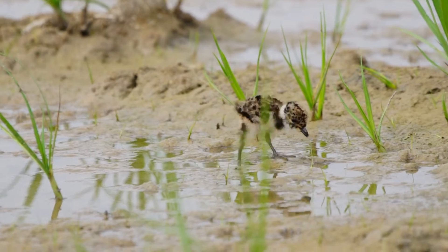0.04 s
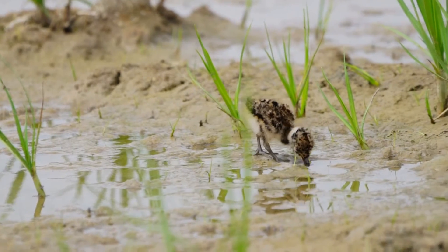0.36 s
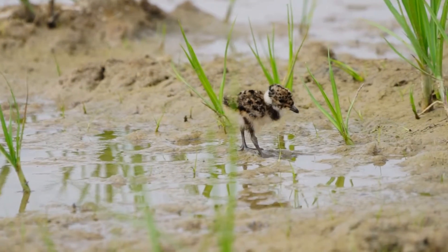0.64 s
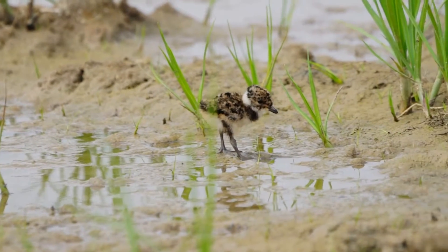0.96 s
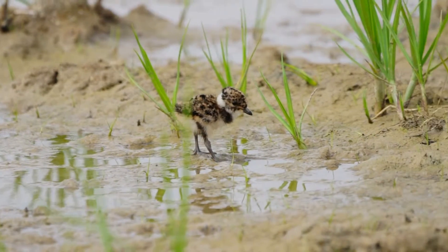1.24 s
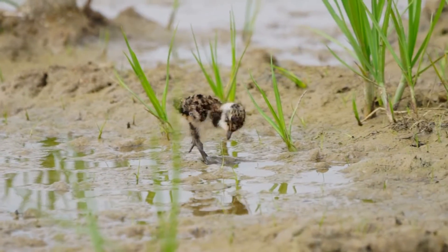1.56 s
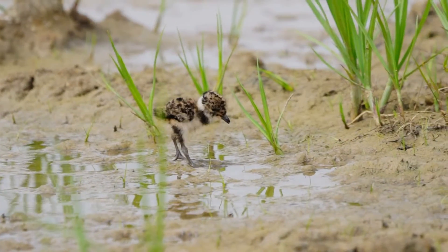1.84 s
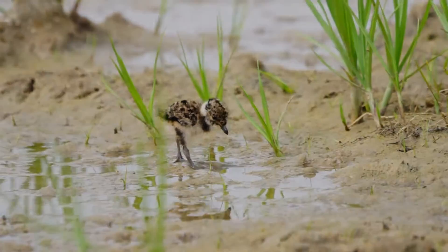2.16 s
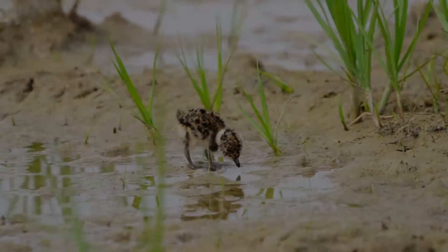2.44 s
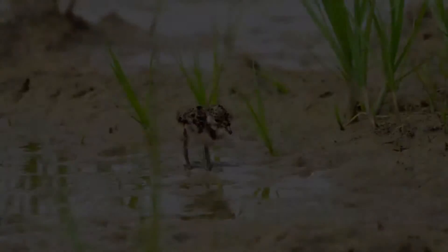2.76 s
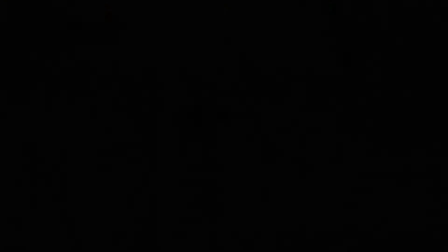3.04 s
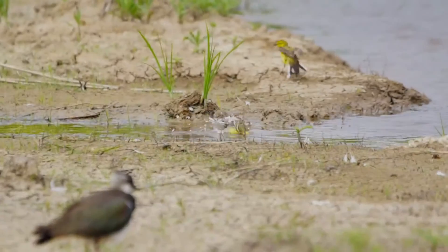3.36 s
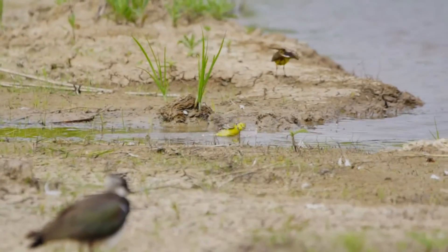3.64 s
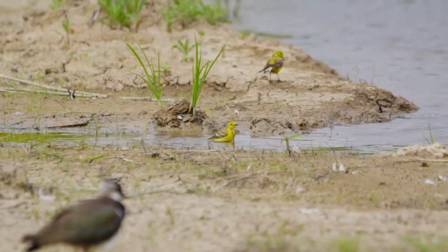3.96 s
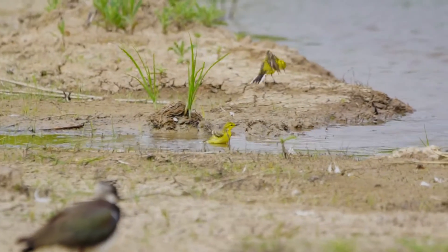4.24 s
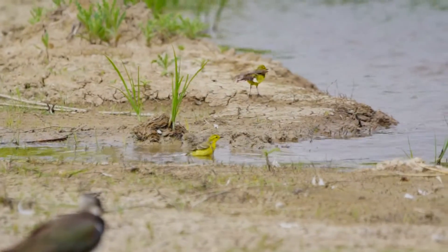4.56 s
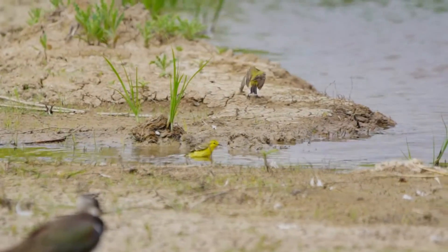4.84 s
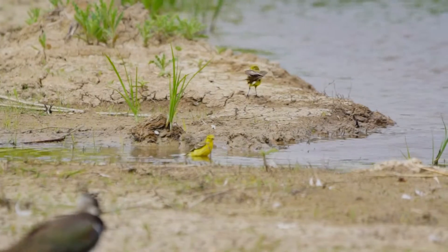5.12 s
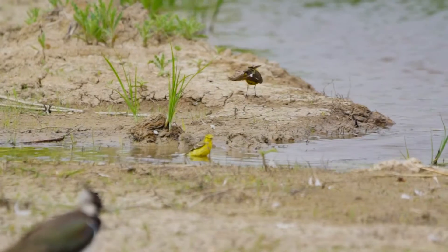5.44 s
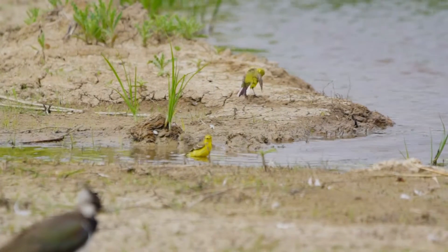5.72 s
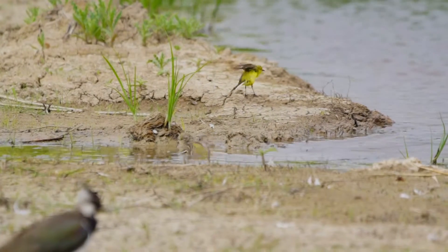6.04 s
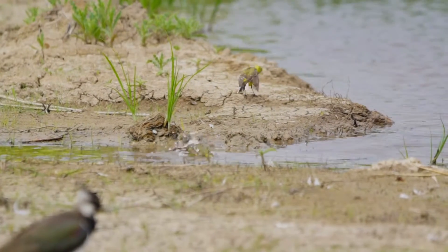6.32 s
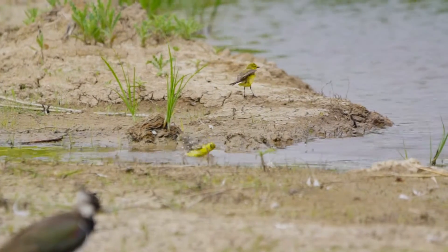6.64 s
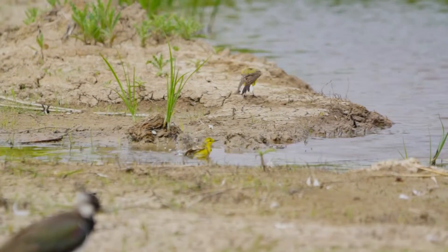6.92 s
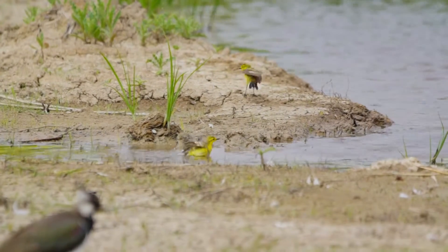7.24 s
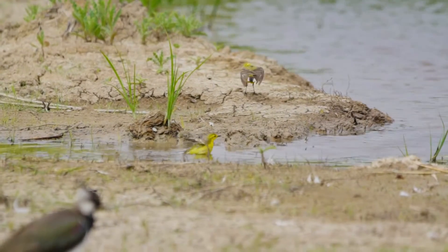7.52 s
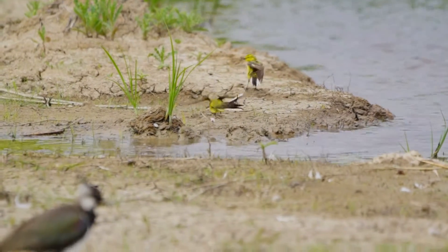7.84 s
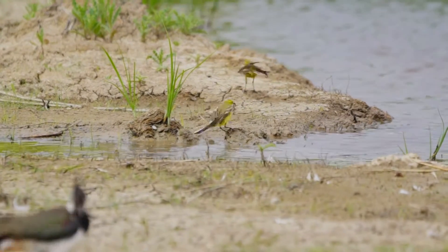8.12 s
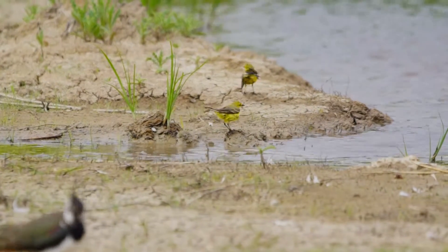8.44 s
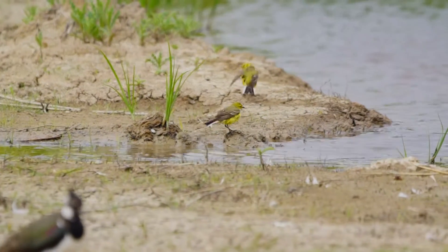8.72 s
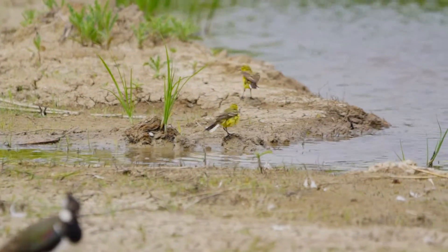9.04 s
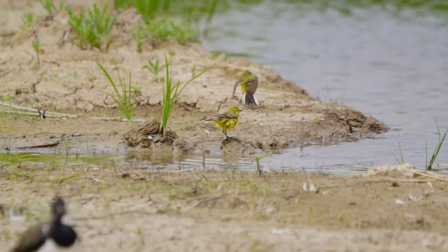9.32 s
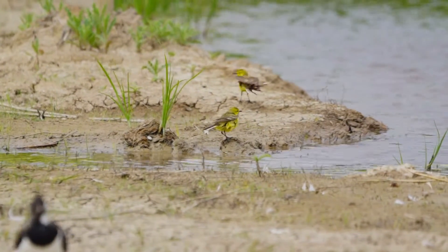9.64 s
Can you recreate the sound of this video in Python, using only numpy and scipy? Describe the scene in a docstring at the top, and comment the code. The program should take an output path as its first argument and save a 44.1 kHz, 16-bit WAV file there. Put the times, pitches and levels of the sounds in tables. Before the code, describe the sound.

On an open wetland shore, small birds chirp, whistle and trill in the distance over a soft hiss and a very light breeze. At about 2.2 seconds a lapwing, close and slightly to the right, gives one loud, harsh, wheezy cry in two parts, ending near 2.8 seconds. Wind rises straight afterwards and buffets the microphone with a low, lumpy rumble, broken by brief lulls. The gusts are strongest from about 5 to 8 seconds, when a thin crackle joins them. The small birds continue faintly underneath, mostly to the left, with short high chips and trills that stand out most around 3 to 6 seconds. A few tiny dry ticks are scattered between 2 and 7 seconds. From about 8.3 seconds the wind eases somewhat, and soft twittering, slurred whistles and a short scratchy bird rattle carry on until the end, just before 10 seconds.

```python
"""A lapwing gives one harsh, wheezy two-part cry on a muddy wetland shore.
One side of its syrinx sings a harmonic stack; the other slaps, chopping the tone and ringing the throat.
Wind rises after the cry and buffets the microphone in lumpy gusts, with brief lulls and a thin crackle.
Far off, small birds chirp, trill and rattle in near-sine glides, over faint ticks and a soft hiss."""
import sys
import numpy as np
from scipy import signal
from scipy.fft import rfft, irfft, next_fast_len
from scipy.io import wavfile
from scipy.ndimage import uniform_filter1d

SR = 44100
rng = np.random.default_rng(int(sys.argv[2]) if len(sys.argv) > 2 else 0)


def generate_wav(signal):
    """Clip the signal to [-1, 1] and save it as 16-bit WAV at the path in sys.argv[1]."""
    frames = np.transpose(np.atleast_2d(signal))
    scaled = np.clip(frames, -1, 1) * 32767
    pcm = np.round(scaled).astype(np.int16)
    wavfile.write(sys.argv[1], SR, pcm)


N = 431298
T = np.arange(N) / SR
SIZE = next_fast_len(N + SR, real=True)
HZ = np.fft.rfftfreq(SIZE, 1 / SR)

# The lapwing's cry. Each row: time in seconds, pitch in Hz, effort in dB, roughness (0 clear, 1 all rasp).
CRY = [(2.204, 1014, -60, 1.1), (2.233, 1051, -43, 0.97), (2.243, 1052, -40, 0.92),
       (2.281, 1073, -36, 0.76), (2.293, 1104, -35.5, 0.34), (2.325, 1160, -33, 0),
       (2.355, 1184, -30.5, 0.18), (2.401, 1223, -35, 0.3), (2.413, 1250, -36, 0.64),
       (2.47, 1292, -40.5, 1.1), (2.52, 1270, -41.5, .98), (2.56, 1237, -60, 1), (2.6, 1196, -43, 0.98),
       (2.64, 1192, -39, 1.02), (2.66, 1160, -32, 0.62), (2.69, 1233, -32, .48), (2.716, 1169, -29, .22),
       (2.733, 1223, -30, 0.23), (2.749, 1144, -37, 0.3), (2.762, 1085, -54, 0.45), (2.776, 1076, -67, .66)]
FULL_EFFORT_DB, BREAK_S = -28, 2.56
# The voice before and after the break. Each row: fundamental in dB, half-pitch lines in dB,
# jitter as a share of the pitch, brightness in dB per octave.
SYLLABLES = [(-9.5, -13.5, .004, 3), (-15.5, -20, 0.0077, -4.5)]
# The sung stack. Each row: harmonic number, relative level in dB.
OVERTONES = [(2, -8), (3, 6.5), (4, -11), (5, -4.5), (6, -4), (7, -14), (8, -9), (9, -12.5), (10, -26),
             (11, -30), (12, -38)]
# The colour of throat and bill. Each row: frequency in Hz, gain in dB.
THROAT_EQ = [(500, -20), (1200, -10), (1800, -25), (2600, -16), (3120, -5), (3600, -7), (4050, -12),
             (4700, -9), (5600, -15), (7100, -11), (8800, -18), (9900, -13), (12500, -27), (15000, -52)]
# The pace of the rough side of the syrinx. Each row: time in seconds, slaps per second.
SLAP_RATE = [(2.24, 195), (2.285, 335), (2.41, 259.5), (2.47, 165), (2.6, 129), (2.65, 190), (2.67, 270),
             (2.74, 290)]
# Lone hard slaps at the onset and around the break. Each row: start in seconds, level in dB.
LONE_SLAPS = [(2.215, -44), (2.228, -44), (2.506, -39), (2.546, -37), (2.568, -35), (2.589, -35.5),
              (2.635, -39)]
# What a slap rings. Each row: frequency in Hz, level in dB with the bill half shut, level in dB with it open.
THROAT_RINGS = [(3150, -8, -11), (3520, 0, -0.5), (3900, -4, -4), (5940, -4, -7.5), (6950, -13, -7.5),
                (9900, -25, -18), (12600, -36, -26)]
# The bill opens: start and end in seconds.
BILL_OPENS_S = (2.31, 2.35)

# The wind's fader ride. Each row: time in seconds, relative level in dB.
WIND_LEVEL = [(0.0, -64), (0.31, -47), (0.94, -62), (0.99, -44), (1.05, -75), (1.52, -74), (1.6, -56),
              (1.82, -48), (2.0, -88), (2.05, -50.5), (2.18, -39), (2.26, -43.5), (2.4, -32.5), (2.44, -38),
              (2.61, -34.5), (2.76, -44.5), (2.8, -27.5), (2.95, -29), (3.15, -40), (3.64, -23),
              (3.69, -27), (4.5, -29), (4.55, -37), (4.57, -24), (4.92, -24), (5.0, -20), (5.19, -22.5),
              (5.39, -29), (5.41, -20.5), (5.62, -20.5), (6.16, -25.5), (6.33, -20), (8.1, -21),
              (8.36, -31.5), (8.53, -27), (8.615, -24.5), (8.66, -26), (9.0, -36.5), (9.35, -26.5),
              (9.78, -30)]
# Wind speed. Each row: time in seconds, factor on the frequencies of the eddies.
WIND_SPEED = [(0, 0.31), (2, 0.5), (2.6, 0.5), (2.9, 0.7), (3.3, 0.81), (3.7, 0.94), (4.4, 0.88),
              (4.9, .92), (5.01, 1.1), (5.33, .86), (5.62, 1.04), (5.75, .88), (6.15, 0.86), (6.35, 1.08),
              (6.6, 1.28), (7.15, 1.08), (7.35, 1.36), (7.72, 1.393), (8.1, 1.14), (8.35, 0.85), (8.53, .9),
              (8.61, 1.2), (8.68, .95), (9, 0.72), (9.4, 0.93), (9.78, 0.89)]
# The rumble of the eddies at speed 1. Each row: frequency in Hz, gain in dB.
EDDY_EQ = [(20, -39), (60, -12), (130, -1), (230, 5.5), (400, 4), (600, -6), (900, -19), (1400, -31),
           (2300, -45), (4000, -65.5), (8000, -71.5), (16000, -77.5)]
# The hardest pushes of air. Each row: time in seconds, relative peak in dB.
BUFFETS = [(0.266, -36), (0.433, -37), (0.698, -38.5), (0.98, -30.5), (2.158, -22.5), (2.19, -21),
           (2.811, -16), (2.925, -15.5), (2.961, -17), (3.048, -22), (3.578, -15), (3.642, -17),
           (3.759, -21), (3.84, -18), (4.145, -19), (4.194, -15), (4.238, -20.5), (4.255, -20),
           (4.573, -15), (4.6, -13.5), (4.648, -16.5), (4.856, -14.5), (4.963, -16.5), (5.003, -13.5),
           (5.09, -23.5), (5.129, -18), (5.219, -16.5), (5.41, -11.5), (5.571, -15.5), (5.757, -17),
           (5.805, -13.5), (5.86, -16), (5.902, -13.5), (5.993, -21), (6.08, -14), (6.235, -17),
           (6.449, -15), (6.514, -13.5), (6.548, -13), (6.99, -14), (7.035, -15.5), (7.122, -19.5),
           (7.155, -17), (7.289, -11.5), (7.479, -16), (7.631, -16), (7.88, -15), (7.987, -20),
           (8.107, -14), (8.41, -23.5), (8.556, -27), (8.62, -17), (8.712, -22.5), (9.317, -17.5),
           (9.397, -18), (9.55, -20)]
# Gaps between gusts. Each row: centre in seconds, half-length in seconds, dip in dB (negative lifts).
LULLS = [(2.1, .03, -4), (3.356, 0.044, 8.5), (3.724, 0.02, 2.5), (4.498, 0.034, 2), (5.328, 0.024, 4.5),
         (5.716, 0.023, 6.5), (5.96, 0.021, 10), (7.087, 0.026, 9), (7.19, 0.025, 7.5), (7.982, .035, 5.5),
         (8.383, 0.021, 12), (8.879, 0.022, 8.5), (9.22, 0.074, 3.5)]
# The wind's stereo image. Each row: frequency in Hz, left-right likeness 0-1, left's lead in radians.
WIND_STEREO = [(30, 0.75, 0.94), (58.7, 0.92, 1.3), (135, 0.73, 0.41), (340, 0.54, 1.83), (734, 0.64, 2.52),
               (1350, 0.85, 3.4), (2970, 0.36, 2.9), (8000, .2, 2)]
# Eddies tearing at a microphone port. Each row: start in seconds, relative peak in dB, decay in seconds.
SPITS = [(4.6107, -30.5, 0.00072), (5.009, -39, 0.0018), (5.222, -36, .0008), (5.418, -33.5, 0.0069),
         (5.5782, -32, .001), (5.635, -37, 0.00079), (5.8081, -26, 0.0011), (6.4427, -27, 0.0017),
         (6.529, -35, 0.0041), (6.608, -26, 0.0012), (6.635, -33.5, 0.0034), (6.7126, -22.5, 0.0013),
         (6.786, -30, 0.0045), (6.926, -31.5, 0.003), (6.988, -27.5, 0.0043), (7.042, -38, 0.0018),
         (7.2905, -19, 0.0014), (7.343, -24.5, 0.0022), (7.386, -29.5, .004), (7.755, -26.5, 0.00064),
         (7.881, -29, 0.00074), (8.1487, -28, 0.00062), (8.2104, -32.5, 0.00099), (8.598, -43, 0.0048),
         (8.6265, -28.5, 0.0012)]

# Six kinds of short bird note: falling, rising, gently rising, arched, drooping and flat.
# Each row: start in seconds, length in seconds, middle pitch in Hz, relative level in dB.
FALLING_CHIPS = [(.562, 0.067, 5050, -58.5), (.755, .022, 4400, -66), (.955, .02, 4250, -71),
                 (1.025, 0.023, 4850, -57), (1.093, 0.02, 4800, -52), (1.163, 0.023, 4700, -52.5),
                 (1.238, 0.02, 4640, -55), (1.35, .025, 4350, -68), (1.56, .029, 4480, -62.5),
                 (1.735, .028, 4380, -65), (2.893, 0.014, 5200, -63), (3.063, .016, 5050, -62),
                 (3.15, 0.023, 3050, -74), (3.266, .02, 4750, -78), (3.345, .019, 3150, -72),
                 (4.146, 0.021, 3050, -68), (4.255, 0.024, 4850, -70), (4.34, .014, 3250, -65),
                 (5.329, 0.0081, 3720, -57), (6, .019, 4650, -69), (8.33, .012, 5300, -77),
                 (8.353, .014, 4700, -78), (8.417, .014, 5200, -75), (8.52, .014, 4700, -77),
                 (8.818, 0.02, 4150, -71), (9.008, 0.026, 4500, -66.5), (9.186, .025, 4450, -73),
                 (9.543, 0.022, 3705, -70)]
RISING_CHIPS = [(.46, 0.037, 5170, -58.5), (1.784, 0.047, 6150, -64), (2.842, 0.05, 4230, -61),
                (2.963, .014, 4370, -60), (3.008, 0.053, 4150, -57.5), (3.215, 0.031, 3400, -74),
                (3.62, .03, 4000, -75), (4.205, 0.041, 3150, -68), (4.635, .035, 4050, -68),
                (5.268, .018, 4650, -70), (5.377, .009, 3340, -57), (5.392, 0.0082, 3020, -64),
                (6.478, .032, 4070, -73)]
LIFTED_CHIPS = [(1.08, .02, 4140, -58), (1.132, .016, 5100, -64), (1.149, .022, 4100, -54.5),
                (1.222, .02, 4120, -55.5), (2.82, .022, 3780, -65), (2.985, .017, 3800, -59),
                (5.199, 0.016, 3680, -64.5)]
ARCHED_CHIPS = [(3.598, .02, 3600, -73), (4.304, .038, 4590, -65), (5.342, 0.0206, 4100, -57.5)]
DROOPING_CHIPS = [(1.143, 0.02, 4420, -60), (3.11, 0.032, 4350, -66), (3.31, .032, 4300, -74),
                  (4.277, .02, 4050, -71), (5.305, .014, 4950, -67), (5.364, 0.009, 3944, -59),
                  (5.688, 0.062, 4060, -65), (6.05, .03, 4280, -71), (7.07, 0.051, 4040, -78),
                  (9.258, 0.028, 2920, -75)]
FLAT_PIPS = [(.428, 0.1, 3360, -71), (.44, 0.03, 4720, -67), (.603, 0.063, 4750, -64),
             (1.109, .05, 3000, -64), (1.183, .03, 3000, -62), (1.246, 0.042, 3000, -63),
             (1.375, 0.022, 3760, -66), (7.53, .1, 4030, -77), (8.685, .04, 5300, -81),
             (8.81, 0.0447, 5350, -77), (8.94, .07, 5210, -77), (9.183, 0.035, 5100, -66),
             (9.49, .017, 4070, -66), (9.766, .03, 3550, -64)]
# Pitch bends: factors on a note's middle pitch at even steps from start to end.
FALL, RISE, SLUR = (1.31, 1.05, .965, .945), (.7, .96, 1.04, 1.3), (.87, .985, 1.017, .975)
LIFT = (.88, 0.98, 1.07)
ARCH = (1, 1, 0.82)
DROOP = (1.06, .93)
# Slurred whistles. Each row: start in seconds, relative level in dB.
WHISTLES = [(.61, -71), (.8, -69.5), (.98, -60.5), (1.174, -56.5), (8.248, -72.5), (8.44, -73.5),
            (8.645, -78), (8.843, -66.5)]
# Sagging trills. Each row: start in seconds, length in seconds, middle pitch in Hz, relative level in dB,
# pitch swing in Hz, beats per second, pulsing depth 0-1, sag as a share of the pitch.
TRILLS = [(0, .14, 4680, -56.5, 202, 150, .35, 0.36), (0.493, 0.085, 6180, -63, 200, 80, .3, .01),
          (1.846, 0.13, 3820, -55.5, 260, 170, 0.4, 0.041), (3.355, .16, 2760, -70.5, 70, 100, .9, .1),
          (3.714, 0.23, 3950, -65.5, 550, 114, 0.4, 0.16), (4.353, 0.16, 2700, -64, 70, 85, .9, 0.097),
          (4.715, 0.25, 3950, -65, 550, 71, 0.2, 0.24), (5.46, 0.22, 4450, -57.5, 170, 45, .25, 0.13),
          (6.546, 0.21, 4350, -71.5, 262, 75, .4, 0.2), (9.072, .065, 4860, -65, 203, 120, .4, 0.054)]
# Scratchy rattles. Each row: start in seconds, length in seconds, relative level in dB.
RATTLES = [(9.352, .06, -74), (9.595, 0.1, -63)]
# The contour of a rattle. Each row: seconds since its start, pitch in Hz, level offset in dB.
RATTLE_CONTOUR = [(0, 3610, -7), (.018, 3750, 0), (.04, 3520, 0), (.067, 3000, -7), (.11, 2700, -6)]
# The pan ride on the small birds. Each row: time in seconds, added left minus right in dB.
BIRD_PAN = [(3.1, 0), (3.2, 5), (7, 6.5), (8.2, 1.5)]

# Faint ticks. Each row: start in seconds, relative level in dB.
TICKS = [(2.0607, -46), (3.3548, -50), (3.8445, -48), (4.5625, -44.5), (4.6714, -47), (4.9781, -48),
         (6.607, -44.5)]
# The colour of the hiss bed. Each row: frequency in Hz, gain in dB.
HISS_EQ = [(30, -6), (150, 1.5), (400, 2.5), (800, -1), (1500, -1.5), (2500, -4), (4500, -7), (7000, -11),
           (10000, -13), (13000, -17), (15500, -29)]
# Its fader ride. Each row: time in seconds, level in dB.
HISS_LEVEL = [(0, -51.5), (2.1, -52.5), (3.12, -51), (3.15, -59.5), (4, -58), (4.7, -55), (6.2, -54),
              (6.9, -60), (7.6, -64.5), (8.3, -63), (9.1, -59), (9.78, -58.5)]
# Its stereo image. Each row: frequency in Hz, left-right likeness 0-1, left's lead in radians.
HISS_STEREO = [(100, 0.97, -1.5), (300, 0.57, 0), (650, 0.32, 2.5), (3000, .2, 3), (15000, 0.22, 3)]


def lapwing(shimmer=9, voice_chop=.49, fundamental_chop=.46):
    """One side of the syrinx sings; the other slaps, chops the voice and makes it rasp."""
    times, *columns = np.transpose(CRY)
    t = np.arange(times[0], times[-1], 1 / SR)
    hz, effort_db, rough = (np.interp(t, times, column) for column in columns)
    rough = np.clip(rough, 0, .99)
    press_db = effort_db - FULL_EFFORT_DB
    base_db, half_db, jitter, tilt = np.array(SYLLABLES)[(t > BREAK_S).astype(int)].T
    # roughness makes the voice shakier and duller
    jitter = jitter + .015 * rough ** 2
    tilt = tilt - 2 * rough
    phase = 2 * np.pi * np.cumsum(hz * (1 + jitter * wobble(len(t), 334))) / SR
    tone = amp(effort_db) * np.sqrt(1 - rough ** 2) * sung_stack(t, hz, phase, tilt, half_db)
    tone *= 1 + shimmer * jitter * wobble(len(t), 300)
    gate, detunes = syrinx_slaps(t)
    # the chop flanks each harmonic with side tones
    tone *= 1 + voice_chop * np.sqrt(rough) * (gate - gate.mean())
    bursts = amp(effort_db) * rough * (gate + .04)  # a little air leaks between slaps
    bursts += sum(amp(db) * np.exp(-((t - start) / .002 - 1) ** 2) for start, db in LONE_SLAPS)
    rasp = bursts * throat_ring(t, hz, detunes)
    # pressing harder opens the top of the rasp
    rasp += (amp(3 + .47 * press_db) - 1) * through(rasp, [(5000, -40), (7000, -9), (8500, 5)])
    fundamental = amp(FULL_EFFORT_DB + base_db + .89 * press_db) * np.sqrt(2) * np.cos(phase)
    fundamental *= 1 + fundamental_chop * rough * (gate - 1)
    out = np.zeros(N)
    add(out, times[0], (fundamental + tone + rasp) * signal.windows.tukey(len(t), .02))
    return out


def sung_stack(t, hz, phase, tilt, half_db, dispersion=.316, flare_at_s=2.75, flare_s=.01):
    """Harmonics, delayed unequally by the throat, that flare bright once as the cry is cut off."""
    flare = np.exp(-((t - flare_at_s) / flare_s) ** 2)
    stack = halves = 0
    for k, db in OVERTONES:
        tilt_db = tilt * np.log2(max(k / 3, 1))
        # the flare lifts everything above the third harmonic, which gives way
        flare_db = 11.5 * (k > 3) * min(1, (6 / k) ** 2) - 9 * (k == 3)
        stack += amp(db + tilt_db + flare * flare_db) * np.cos(k * phase - dispersion * k ** 2)
    # strong and weak cycles alternate, which puts lines between the harmonics
    for k in range(10):
        halves += amp(at_hz(THROAT_EQ, (k + .5) * hz)) * np.cos((k + .5) * phase - dispersion * k ** 2)
    return steady(stack, size=300) + amp(half_db) * unit(halves)


def syrinx_slaps(t, uneven=.143, spread_db=2):
    """A gate of unevenly paced slaps, each with its own force and its own detuning of the throat."""
    rate = np.interp(t, *np.transpose(SLAP_RATE)) * np.exp(uneven * wobble(len(t), 153))
    count = np.cumsum(rate) / SR
    force, *detunes = rng.standard_normal((len(t), 1 + len(THROAT_RINGS)))[count.astype(int)].T
    pulses = amp(spread_db * force) * abs(np.sin(np.pi * count)) ** 1.5
    return steady(pulses, size=700), detunes


def throat_ring(t, hz, detunes, scatter=.038, air_db=-5):
    """The throat rings a little differently at each slap and carries some air."""
    stretch = (hz / 1250) ** .45  # the rings partly follow the pitch
    ring = 0
    for (centre_hz, *bill_db), detune in zip(THROAT_RINGS, detunes):
        phase = 2 * np.pi * np.cumsum(centre_hz * stretch * (1 + scatter * detune)) / SR
        ring += amp(np.interp(t, BILL_OPENS_S, bill_db)) * np.cos(phase)
    breath = unit(through(rng.standard_normal(len(t)), THROAT_EQ))
    return unit(unit(ring) + amp(air_db) * breath)


def wind(gain_db=2, flutter_db=1.25, lump_db=4, buffet_s=.0072, surge_cap_db=9):
    """Eddies tumble over the microphone's two ports; faster air is louder, its eddies smaller and higher."""
    dips_db = sum(depth * np.exp(-((T - centre) / half) ** 2) for centre, half, depth in LULLS)
    mean_speed = over_time(WIND_SPEED)
    # in strong wind the lumps crowd together into a denser rush
    lumpiness = np.maximum(mean_speed, 1) ** -1.5
    breeze = amp(over_time(WIND_LEVEL) - dips_db + flutter_db * lumpiness * wobble(N, 11))
    pushes, t = np.zeros(N), np.arange(SR // 8) / SR
    for start, db in BUFFETS:
        add(pushes, start - .002, amp(db - 2) * t / buffet_s * np.exp(1 - t / buffet_s))
    # air has inertia: a push takes a few milliseconds to build
    force = uniform_filter1d(uniform_filter1d(np.maximum(breeze, pushes), size=140), size=100)
    lumps_db = lump_db * lumpiness * wobble(N, 58)
    # each surge briefly brightens the rumble
    surge_db = lumps_db + 20 * np.log10(force / uniform_filter1d(force, size=16000))
    speed = mean_speed * np.exp(.018 * surge_cap_db * np.tanh(surge_db / surge_cap_db))
    rumble = steady(eddies(speed[::32]) * amp(lumps_db), size=1500)
    return rumble * force * amp(gain_db + 4 * np.log2(mean_speed))


def eddies(speed):
    """Stereo noise in 16 bands, its spectrum sliding up and down with the air speed."""
    white, centres = noise_pair(WIND_STEREO), np.geomspace(25, 12800, 16)
    times = np.linspace(0, T[-1], len(speed))
    air = np.zeros((2, N))
    for hz, pick in zip(centres, np.eye(len(centres))):
        band = irfft(white * np.interp(HZ, centres, pick), SIZE)[:, :N]
        air += band * np.interp(T, times, amp(at_hz(EDDY_EQ, hz / speed)))
    return air


def wind_spits(gain_db=5, count=170, small_decay_s=.0023, far_port=.38):
    """Tearing puffs push the two ports opposite ways; small ones crowd in wherever the air is fast."""
    out, t = np.zeros(N), np.arange(2048) / SR
    lead = len(t) // 8
    speed = over_time(WIND_SPEED)
    odds = np.cumsum(speed ** 6)
    when, softness = rng.random((count, 2)).T
    at = np.searchsorted(odds, when * odds[-1])
    small_db = -44 - .8 * np.log(softness + .05) + 18 * np.log2(speed[at])
    small_spits = np.c_[T[at], small_db, np.full(count, small_decay_s)]
    colour = [(60, -34), (400, 0), (1100, 9.5), (2300, -8), (6000, -41), (14000, -67)]
    for start, db, decay in np.vstack([SPITS, small_spits]):
        puff = rng.standard_normal(len(t)) * t * np.exp(-t / decay)
        puff = through(np.roll(puff, lead), colour)
        add(out, start - t[lead], amp(db + gain_db) * puff / abs(puff).max())
    return 2 * np.array([out, -far_port * out])


def small_birds(chirp_db=6.5, rattle_step_s=.0136):
    """Chips, pips, slurred whistles, trills and rattles from along the shore."""
    chirps, trills = np.zeros((2, N))
    for table, glide in ((FALLING_CHIPS, FALL), (RISING_CHIPS, RISE), (LIFTED_CHIPS, LIFT),
                         (ARCHED_CHIPS, ARCH), (DROOPING_CHIPS, DROOP), (FLAT_PIPS, (1, 1))):
        for start, *shape in table:
            add(chirps, start, bird_note(*shape, glide=glide))
    for start, db in WHISTLES:  # a quick falling chip leads each one in
        add(chirps, start - .026, bird_note(length=.0244, middle_hz=4300, db=-78, glide=FALL))
        add(chirps, start, bird_note(length=.103, middle_hz=3480, db=db, glide=SLUR))
    for start, *shape, pulsing, sag in TRILLS:
        glide = 1 + .56 * sag, 1 - .44 * sag
        add(trills, start, bird_note(*shape, glide=glide, pulsing=pulsing, swell_db=2.5))
    times, *contour = np.transpose(RATTLE_CONTOUR)
    for start, length, db in RATTLES:
        for since in np.arange(0, length, rattle_step_s):
            hz, offset_db = (np.interp(since, times, column) for column in contour)
            add(chirps, start + since, bird_note(.0068, hz, db + offset_db, glide=LIFT))
    return amp(chirp_db) * chirps + trills


def bird_note(length, middle_hz, db, swing_hz=0, beats=0, glide=(1, 1), pulsing=0, swell_db=3):
    """A near-sine glide along a smooth curve; in a trill its pitch and level beat together."""
    t = np.arange(0, max(length, .005), 1 / SR)
    bend = np.polyfit(np.linspace(0, 1, len(glide)), glide, len(glide) - 1)
    arc_hz = middle_hz * np.polyval(bend, t / t[-1])
    beat = np.sin(2 * np.pi * beats * np.cumsum(1 + .066 * wobble(len(t), 60)) / SR)
    hz = arc_hz * (1 + .009 * wobble(len(t), 300)) + swing_hz * beat
    fades = signal.windows.tukey(len(t), min(.7, .03 / t[-1]))
    envelope = fades * (1 + pulsing * beat) * amp(1.6 * wobble(len(t), 80) + swell_db * t / t[-1])
    return amp(db) * unit(envelope * np.sin(2 * np.pi * np.cumsum(hz) / SR))


def distant_twitter(count=16, centre_hz=4700):
    """Quick falling chips of more distant birds, at the start and again as the wind eases."""
    out = np.zeros(N)
    for when, pitch, softness in rng.random((count, 3)):
        start = np.interp(when, [0, .5, .501, 1], [0, 2, 8.3, 9.6])
        hz = centre_hz * 1.3 ** (pitch - .5)
        add(out, start, bird_note(.025, hz, db=-73 - 6 * softness, glide=FALL))
    return out


def ticks(decay_s=.0031, gain_db=-3):
    """Tiny dry ticks: bright grains of noise that die at once."""
    out, t = np.zeros(N), np.arange(1024) / SR
    colour = [(500, -19), (3500, 5), (7000, -8.5), (14000, -17)]
    for start, db in TICKS:
        grain = unit(through(rng.standard_normal(len(t)), colour))
        add(out, start, amp(db + gain_db) * grain * np.exp(-t / decay_s))
    return out


def hiss(flutter_db=1):
    """The soft wash of open country, a wide noise bed with a slight flutter."""
    wash = unit(irfft(noise_pair(HISS_STEREO) * amp(at_hz(HISS_EQ, HZ)), SIZE)[:, :N])
    return wash * amp(over_time(HISS_LEVEL) + flutter_db * wobble(N, 22))


def open_air(x, wet_db, t60, balance_db, lag_s=0):
    """Pans a sound, which reaches the left port lag_s later; ground and reeds scatter a short tail."""
    t = np.arange(SR // 2) / SR
    tail = rng.standard_normal((2, len(t))) * amp(-60 * t / t60) * (t > .004)
    tail /= np.linalg.norm(tail, axis=1, keepdims=True)
    direct = np.array([np.interp(T - lag_s, T, x), x])
    scattered = signal.fftconvolve(x[None], tail, axes=1)[:, :N]
    return (direct + amp(wet_db) * scattered) * amp([[balance_db / 2], [-balance_db / 2]])


def amp(db):
    """Decibels to gain."""
    return 10 ** (np.asarray(db) / 20)


def unit(x):
    """Scales to rms 1."""
    return x / np.sqrt(np.mean(x ** 2) + 1e-20)


def steady(x, size):
    """Levels a sound to rms 1 over stretches of about size samples."""
    power = np.atleast_2d(x ** 2).mean(0)
    return x / np.sqrt(abs(uniform_filter1d(uniform_filter1d(power, size), size)) + 1e-20)


def at_hz(points, hz):
    """Reads a table on a log-frequency axis."""
    f, value = np.transpose(points)
    return np.interp(np.log(hz + 1), np.log(f + 1), value)


def over_time(points):
    """Reads a curve at every sample."""
    return np.interp(T, *np.transpose(points))


def add(mix, start, sound):
    """Mixes a sound in at start seconds."""
    part = mix[max(round(start * SR), 0):][:len(sound)]
    part += sound[:len(part)]


def wobble(count, hz):
    """Smooth random modulation of rms 1, rolled off above hz."""
    size = next_fast_len(count, real=True)
    f = np.fft.rfftfreq(size, 1 / SR)
    return unit(irfft(rfft(rng.standard_normal(size)) / (1 + (f / hz) ** 4), size)[:count])


def noise_pair(stereo):
    """Spectra of two white noises with the given likeness and phase lead."""
    left, other = rfft(rng.standard_normal((2, SIZE)))
    f, likeness, lead = np.transpose(stereo)
    shared = np.clip(at_hz(np.c_[f, likeness], HZ), -1, 1)
    right = shared * left + np.sqrt(1 - shared ** 2) * other
    return np.array([left, right * np.exp(-1j * at_hz(np.c_[f, lead], HZ))])


def through(x, points):
    """Colours a short sound with an EQ curve of (Hz, dB) points."""
    return irfft(rfft(x) * amp(at_hz(points, np.fft.rfftfreq(len(x), 1 / SR))), len(x))


def scene():
    """The lapwing near and to the right, small birds far to the left, with ticks, wind and hiss."""
    near = amp(-2.5) * open_air(lapwing(), wet_db=-9.5, t60=.12, balance_db=-5)
    far = open_air(small_birds() + distant_twitter(), wet_db=-8.5, t60=.23, balance_db=2.5, lag_s=.00004)
    far *= amp(np.outer([.5, -.5], over_time(BIRD_PAN)))
    return near + far + ticks() + wind() + wind_spits() + hiss()


def record(dry, ceiling=.75, cutoff_hz=15500):
    """A soft clip rounds off the hardest gusts; a steep low-pass trims the top."""
    rounded = ceiling * np.tanh(dry / ceiling)
    low_pass = signal.firwin(511, cutoff_hz, window=("kaiser", 9), fs=SR)
    return signal.oaconvolve(rounded, low_pass[None], "same")


dry = scene()
out = record(dry)
generate_wav(out)
```